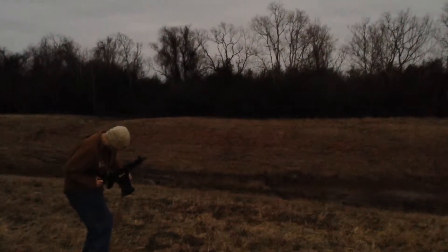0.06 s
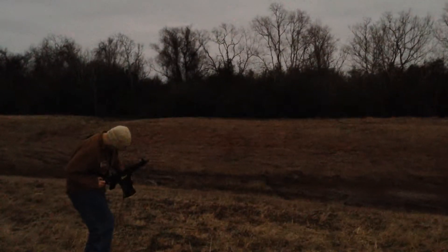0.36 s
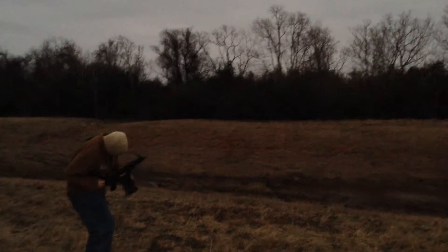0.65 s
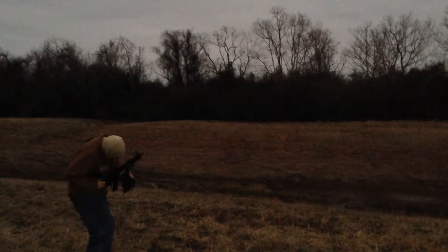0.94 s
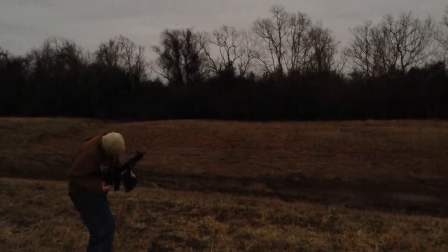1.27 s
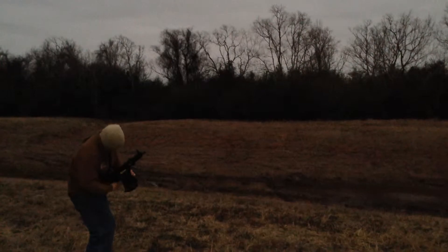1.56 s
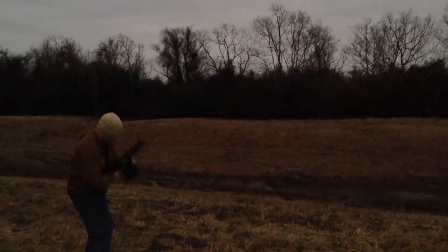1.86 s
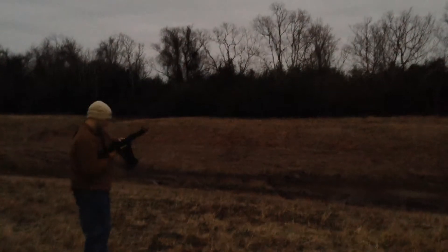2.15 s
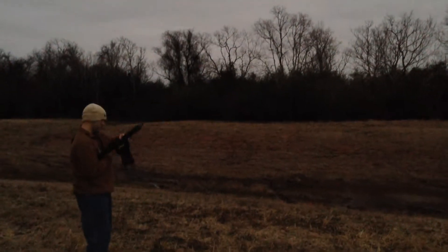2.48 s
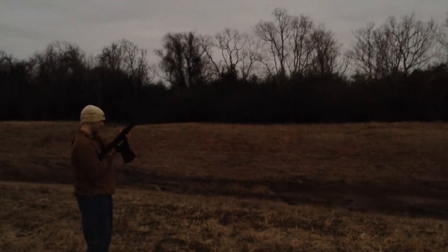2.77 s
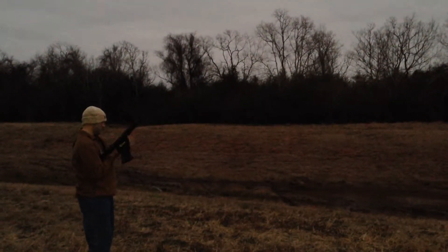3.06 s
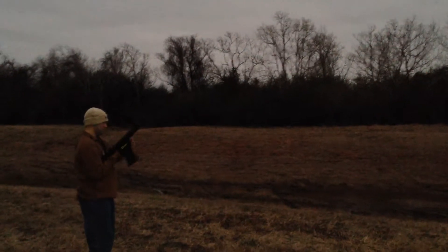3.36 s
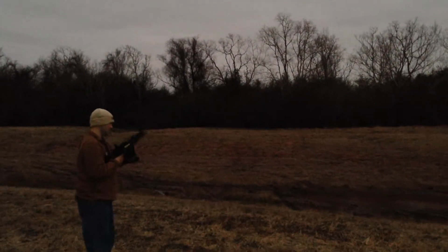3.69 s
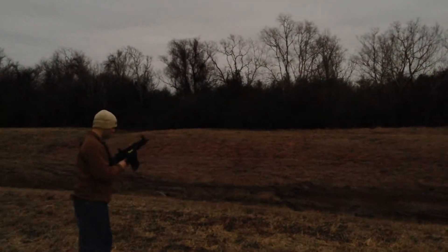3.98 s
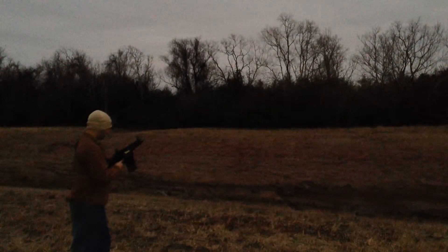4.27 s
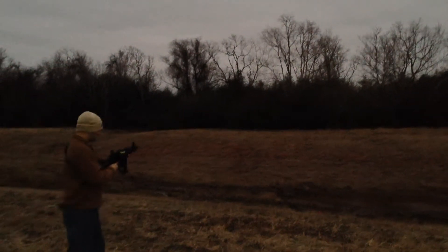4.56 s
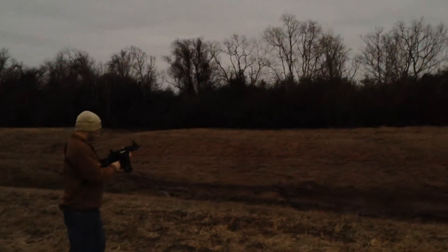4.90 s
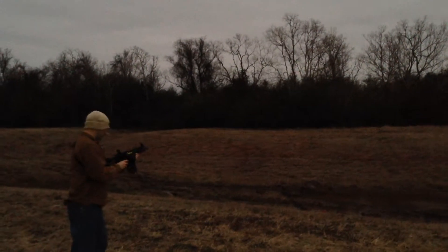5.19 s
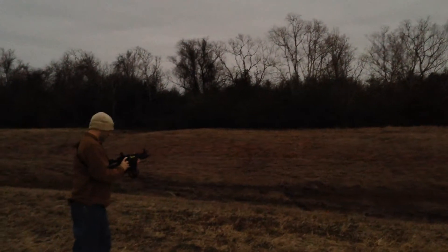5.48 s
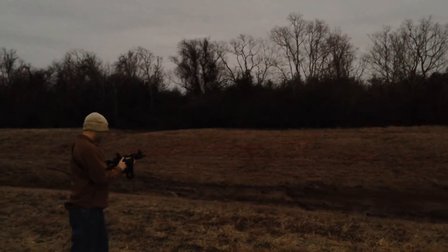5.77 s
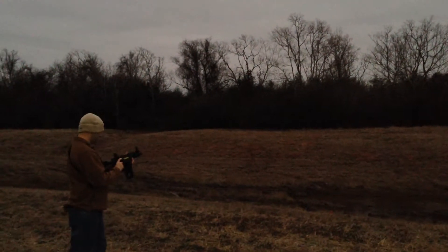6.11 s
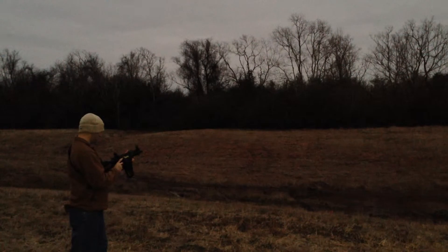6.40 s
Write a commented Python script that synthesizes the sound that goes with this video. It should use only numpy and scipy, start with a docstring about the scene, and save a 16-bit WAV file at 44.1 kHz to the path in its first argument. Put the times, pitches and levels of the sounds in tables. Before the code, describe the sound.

Two loud steel clacks stand out against faint wind, hiss and distant traffic: first a gun's magazine knocking into place, then the bolt snapping closed. A sleeve swishes softly and the microphone takes a few low bumps around the first clack. Afterwards small controls click at uneven intervals, some with a thin ring. It is all heard from several metres away in an open field with a slight echo.

```python
"""A firearm is handled in an open winter field: the magazine slides in and latches, the bolt is slapped
shut, and small controls click with a thin ring. Each time steel hits steel, a burst of noise makes the
crack and fading tones make the ring. A sleeve brushes the stock; an earth bank and trees echo faintly.
Light wind, far traffic and hiss lie underneath. The camera, some metres off, picks up a few soft bumps
and turns itself down after the two loud clacks."""
import sys
import numpy as np
from scipy import signal
from scipy.fft import rfft, irfft, next_fast_len
from scipy.io import wavfile
from scipy.ndimage import uniform_filter1d, map_coordinates

SR = 44100
rng = np.random.default_rng(int(sys.argv[2]) if len(sys.argv) > 2 else 0)


def transcribe(u):
    """Save the signal u as a 16-bit wav file named by the first command-line argument.

    u: samples, shape (n,) or (channels, n), limited to [-1, 1]; the rate is SR.
    q: integer samples, one column per channel.
    """
    v = np.clip(np.atleast_2d(u).T, -1, 1)
    q = np.round(v * 32767).astype(np.int16)
    wavfile.write(sys.argv[1], SR, q)


N = 292878
T = np.arange(N) / SR  # time in the scene [s]
AGE = np.arange(SR // 3) / SR  # time since a hit [s]


def amp(db):
    """Turn decibels into a gain to multiply by."""
    return 10 ** (np.asarray(db) / 20)


def unit(x):
    """Scale to an average (rms) level of 1."""
    return x / np.sqrt(np.mean(x ** 2) + 1e-20)


def gain(points, hz):
    """Read the gain at hz off a tone curve of (frequency [Hz], level [dB]) points."""
    freqs, db = np.transpose(points)
    return amp(np.interp(np.log(hz + 1), np.log(freqs), db))


def curve(rows):
    """Join (time [s], value) points with straight lines."""
    return np.interp(T, *np.transpose(rows))


def wobble(rate):
    """A smooth curve through `rate` random values a second."""
    return map_coordinates(rng.standard_normal(int(T[-1] * rate) + 4), [T * rate])


def swells(rows):
    """Smooth rises and falls in gain from (time [s], level [dB], length [s]) rows."""
    return sum(amp(db) * np.exp(-((T - s) / length) ** 2) for s, db, length in rows)


def rise_fall(t, rise, fall):
    """Gain that climbs to 1 at t = 0 and dies again, both in dB per second."""
    return amp(-np.abs(t * np.where(t < 0, rise, fall)))


def filtered(x, response):
    """Change the tone of x so that nothing sounds before the hit (a minimum-phase filter)."""
    size = 2 * next_fast_len(len(x))
    gains = np.maximum(response(np.fft.rfftfreq(size, 1 / SR)), 1e-6)
    cepstrum = irfft(np.log(gains))
    cepstrum[1:size // 2] *= 2
    cepstrum[size // 2 + 1:] = 0
    return irfft(rfft(x, size) * np.exp(rfft(cepstrum)))[:len(x)]


def noise(tone, size=N):
    """Noise shaped by a tone curve, at an average level of 1."""
    padded = next_fast_len(size)
    white = rfft(rng.standard_normal(padded))
    shaped = white * gain(tone, np.fft.rfftfreq(padded, 1 / SR))
    return unit(irfft(shaped, padded)[:size])


def add(track, s, sound):
    """Mix a sound in at s seconds."""
    part = track[max(round(s * SR), 0):][:len(sound)]
    part += sound[:len(part)]


def ring(notes, scatter_db):
    """Struck steel rings a little differently each time; a note drops 60 dB in its fade time."""
    hz, db, fade = np.transpose(notes)[:, :, None]
    strength = amp(db + scatter_db * rng.standard_normal(db.shape))
    waves = strength * amp(-60 * AGE / fade) * np.sin(2 * np.pi * (hz * AGE + rng.random(hz.shape)))
    return waves.sum(0) / np.sqrt(np.sum(strength ** 2) / 2)


def steel_hit(crack, notes, ring_db, knock_db, bright_db, fade, hold_s, grip=0.047, bass_db=-8):
    """Steel hits steel: the parts chatter for hold_s, then the crack fades and the notes ring on."""
    attack = 1 - np.exp(-AGE / .00015)
    burst = noise(crack, size=len(AGE)) * amp(-60 * np.maximum(AGE - hold_s, 0) / fade)
    body = amp(ring_db) * ring(notes, scatter_db=1.5)
    body *= amp(-60 * grip * AGE / fade)  # tight contact muffles the ring
    # small parts give little bass; knock lifts the lows of heavy hits, brightness the highs of sharp ones
    tone = [(130, knock_db + bass_db), (230, knock_db), (1500, knock_db), (2400, knock_db * .7),
            (3900, 0), (5800, 0), (9000, bright_db), (15000, 2.1 * bright_db)]
    return filtered(attack * (burst + body), lambda hz: gain(tone, hz))


def clack(hits, crack, notes, ring_db, hold_s):
    """A quick run of hits and bounces on one part."""
    out = np.zeros(N)
    for s, db, knock_db, bright_db, fade in hits:
        add(out, s, amp(db) * steel_hit(crack, notes, ring_db, knock_db, bright_db, fade, hold_s))
    return out


# how hard the wind blows: (time [s], relative level [dB])
WIND_STRENGTH = [(0.03, -56.5), (0.56, -72), (1.24, -64), (1.57, -75), (1.89, -71), (3.23, -65),
                 (3.58, -67.5), (4.93, -62.5), (5.57, -69.5), (5.9, -62.5), (6.64, -63.5)]
# puffs on the microphone, and dry grass stirring: (time [s], level [dB], length [s])
WIND_PUFFS = [(.15, -58, 0.012), (.31, -59, 0.02), (.41, -58, .025), (.74, -53.5, 0.015),
              (1.12, -52.5, .03), (1.28, -51, .03), (1.83, -59, 0.032), (2.12, -55.5, 0.042),
              (2.57, -60, 0.019), (4.34, -65, .02), (5.36, -62.5, 0.024), (6.53, -56.5, .025)]
GRASS_STIRS = [(.25, -78.5, .65), (4.83, -76.5, 0.13), (5.8, -83, 1)]
# tone of the wind and of the hiss: (frequency [Hz], level [dB])
WIND_TONE = [(20, -26.5), (35, -12.5), (55, 1), (85, -1), (130, -6), (200, -18), (400, -31.5), (900, -59.5)]
HISS_TONE = [(200, -5.5), (1500, -1.5), (2500, -1), (3800, 2), (6000, 0.5), (10000, -1.5), (15000, -2.5)]


def breeze(lift_db=2.5, flutter_db=2.5, hiss_db=-68.5):
    """Wind flutters and puffs on the microphone; a fine hiss swells as dry grass stirs."""
    gusts = amp(curve(WIND_STRENGTH) + lift_db + flutter_db * wobble(16))
    rumble = (gusts + swells(WIND_PUFFS)) * noise(WIND_TONE)
    hiss = (amp(hiss_db) + swells(GRASS_STIRS)) * noise(HISS_TONE)
    return rumble + hiss


# how loud the traffic is: (time [s], relative level [dB])
ROAR_LEVEL = [(0.0, -66.5), (1.76, -71), (2.62, -66), (3.14, -69), (4.9, -70.5), (6.19, -67.5),
              (6.64, -68.5)]
# tone of its roar: (frequency [Hz], level [dB])
ROAR_TONE = [(60, -6.5), (150, 1), (350, -1), (550, -1.5), (900, -3.5), (1300, -10), (2000, -22.5),
             (4000, -45)]
# tyres whine as cars pass: (time [s], level [dB], length [s])
TYRE_WHINES = [(2.62, -70, .2), (3.68, -68.5, .27)]


def far_road(lift_db=1.5, engine_hz=55, tyre_hz=506):
    """Far traffic roars softly, an engine drones slowly nearer and tyres give a wavering whine."""
    roar = amp(curve(ROAR_LEVEL) + lift_db + .7 * wobble(4.4)) * noise(ROAR_TONE)
    drone_db = -76.5 + 0.84 * T + 2 * wobble(2.6)
    drone = amp(drone_db) * np.sin(2 * np.pi * np.cumsum(engine_hz + wobble(2)) / SR)
    whine_hz = tyre_hz + 8 * T + 14 * wobble(90)
    whine = swells(TYRE_WHINES) * amp(2 * wobble(25)) * np.sin(2 * np.pi * np.cumsum(whine_hz) / SR)
    return roar + drone + whine


# sharp clicks, plus a soft, dull echo at 0.1 s: (time [s], relative level [dB], knock [dB],
# brightness [dB], fade [s], body pitch [Hz], catch pitch [Hz], spring level [dB])
CLICKS_AND_ECHO = [(0.0005, -41.5, 12.5, -2, 0.075, 1410, 3260, -90),
                   (.1, -64, 8, -10, 0.26, 1500, 2100, -90), (2.0409, -40.5, 0, -6, 0.025, 2800, 3650, -90),
                   (2.8746, -66.5, -13, 9, 0.013, 7500, 9930, -88),
                   (3.4829, -53, 11, -7, 0.014, 1900, 7000, -90),
                   (3.9738, -38, 1.5, 1.5, 0.028, 1315, 3900, -50),
                   (3.9830, -46.5, 5, -24, 0.033, 990, 2090, -70),
                   (3.9950, -56, 7, 4, 0.074, 1800, 5530, -55),
                   (4.4583, -39, 5.5, -1.5, 0.017, 1020, 4860, -55),
                   (4.9329, -38, 2.5, 2.5, 0.029, 1934, 2960, -60),
                   (4.984, -49.5, 6.5, -11, 0.016, 2076, 3820, -90),
                   (5.151, -43, -2, 0, 0.03, 1460, 6700, -48),
                   (5.9450, -59.5, -1, 5.5, .04, 2500, 4530, -89),
                   (6.247, -54.5, -18, 5.5, 0.02, 3840, 6500, -60)]
# tone of a click's crack: (frequency [Hz], level [dB])
CLICK_TONE = [(150, -25), (500, -19), (900, -7.5), (1300, -4.5), (1700, -7), (2600, -8.5), (5000, -1),
              (7500, -4), (11000, -6.5), (15000, -8)]
# ringing notes of a catch and of its spring: (pitch [Hz], relative level [dB], fade [s])
CATCH_NOTES = [(783, 2, 0.033), (1285, -1.5, 0.068), (2023, -5.5, 0.047), (2728, -1, 0.032),
               (4440, 7, 0.027), (5300, 3, .03)]
SPRING_NOTES = [(10900, 5, 0.14), (10975, 4, 0.13), (11200, 2, 0.079), (14700, -5, 0.13), (15050, -9, .07)]


def clicks(boost_db=10, width=0.18, bounce_s=.0075, bounce_db=-11, spring_rise_s=.006):
    """Sharp clicks bounce once and set a spring singing; a soft, dull echo follows the opening clack."""
    out = np.zeros(N)
    spring_rise = 1 - np.exp(-AGE / spring_rise_s)  # the spring takes a moment to pick up the blow
    for s, db, knock_db, bright_db, fade, body_hz, catch_hz, spring_db in CLICKS_AND_ECHO:
        def resonance(hz):
            """Boost the sound near the row's two pitches."""
            return amp(sum(boost_db / (1 + ((hz / peak - 1) / width) ** 2)
                           for peak in (body_hz, catch_hz)))

        for delay, drop_db in ((0, 0), (bounce_s, bounce_db)):
            hit = steel_hit(CLICK_TONE, CATCH_NOTES, ring_db=-10.5, knock_db=knock_db,
                            bright_db=bright_db, fade=fade, hold_s=0.00032)
            add(out, s + delay, amp(db + drop_db - boost_db / 2) * filtered(hit, resonance))
        add(out, s, amp(spring_db) * spring_rise * ring(SPRING_NOTES, scatter_db=1))
    return out


# echoes off ground, bank and trees: (delay [s], relative level [dB], rise [dB/s], fall [dB/s])
ECHOES = [(.05, -7, 280, 60), (.105, 2, 450, 280), (.24, -5, 601.5, 80)]
# their tone: (frequency [Hz], level [dB])
ECHO_TONE = [(200, -10.5), (1000, -0.5), (2200, 1), (4200, -2), (8000, -4), (14000, -15)]


def field_echo(x, level_db=-43):
    """The ground, the bank and the trees each scatter back a faint, dull echo."""
    t = np.arange(SR) / SR
    shape = np.max([amp(db) * rise_fall(t - delay, rise, fall) for delay, db, rise, fall in ECHOES], 0)
    tail = noise(ECHO_TONE, size=SR) * shape
    return amp(level_db) * signal.fftconvolve(x, tail / np.linalg.norm(tail))[:N]


# swishes of cloth: (time [s], level [dB], length [s])
SWISHES = [(0.723, -66, 0.03), (.8, -72, 0.015), (1.142, -55, 0.015), (1.286, -67.5, 0.062),
           (1.66, -70.5, .03), (2.531, -72.5, 0.041)]
# their tone: (frequency [Hz], level [dB])
CLOTH_TONE = [(500, -35), (2000, 3), (2800, -12), (3800, 11), (4600, -0.5), (6500, -6), (10000, -32)]


def sleeve(rough_db=2.9):
    """A sleeve brushes the stock in short, grainy swishes."""
    return swells(SWISHES) * unit(noise(CLOTH_TONE) * amp(rough_db * wobble(150)))


# magazine, then bolt, sliding home:
# (stop time [s], level [dB], rise [dB/s], tail level [dB], tail length [s])
STROKES = [(1.031, -36, 340, -46.5, .042), (3.15, -32, 1499.5, -48.5, 0.034)]
# tone of steel rubbing steel: (frequency [Hz], level [dB])
SCRAPE_TONE = [(150, -26), (500, -7), (1300, 3.5), (2400, -4.5), (4000, 1.5), (6000, -4), (8000, -3),
               (11000, -3), (15000, -11)]


def sliding(stop_db_per_s=780, tail_lag_s=0.041, rough_db=1.4):
    """Parts rub ever harder on their way in and stop short; a brief hissy tail follows each stroke."""
    rubbing = sum(amp(db) * rise_fall(T - s, rise, stop_db_per_s) for s, db, rise, _, _ in STROKES)
    tails = swells([(s + tail_lag_s, db, length) for s, _, _, db, length in STROKES])
    scrape = unit(noise(SCRAPE_TONE) * amp(rough_db * wobble(600)))
    return np.maximum(rubbing, tails) * scrape


# the magazine's hits: (time [s], level [dB], knock [dB], brightness [dB], fade [s])
MAGAZINE_HITS = [(1.0022, -22, -15.5, -5.5, 0.0092), (1.0122, -22, -20.5, 0.5, 0.017),
                 (1.0305, -22.5, -4.5, -2.5, .025), (1.0328, -12.5, 0.5, 1.5, 0.039),
                 (1.0358, -8.5, -0.5, -1, 0.021), (1.0465, -22, -2.5, 1, 0.032),
                 (1.0495, -30, -4, -1.5, 0.087)]
# tone of their crack: (frequency [Hz], level [dB])
MAGAZINE_TONE = [(100, -43.5), (280, -26), (370, -10.5), (650, -5), (820, -18.5), (1030, -2.5),
                 (1600, -9.5), (2600, -3), (3900, 2), (4800, -5), (6200, 3), (7500, -3.5), (11000, -4),
                 (15000, -9)]
# the magazine's ringing notes: (pitch [Hz], relative level [dB], fade [s])
MAGAZINE_NOTES = [(352, -18, 0.068), (549, -17.5, 0.01), (659.7, -12.5, .04), (1033, -2, 0.03),
                  (1414.6, -5.5, 0.057), (1905, 4, 0.031), (2230, -10.5, .04), (3004, -6.5, 0.045),
                  (3600, -7.5, 0.058), (3845, -3.5, 0.063), (4811, -9.5, .05), (5290, -8, 0.1),
                  (5447, -3, 0.033), (6100, -6.5, 0.028), (7630, -7, .04), (8000, -6, 0.051),
                  (8900, -4, .05), (11440, -6.5, 0.034)]


def magazine():
    """The magazine knocks into place, latches and rings briefly."""
    return clack(MAGAZINE_HITS, MAGAZINE_TONE, MAGAZINE_NOTES, ring_db=-5, hold_s=.0001)


# low bumps at the camera: (time [s], level [dB], pitch [Hz], length [s])
SOFT_BUMPS = [(1.1568, -31, 220, 0.0018), (1.1616, -31.5, 109, 0.0022), (1.197, -42.5, 105, 0.0088),
              (1.266, -34, 225, 0.0039), (1.341, -42.5, 110, 0.0085)]
# tone of the shudder around them: (frequency [Hz], level [dB])
SHUDDER_TONE = [(30, -9.5), (60, -0.5), (110, 1), (200, -10), (400, -24), (900, -51)]


def bumps(lag_s=.008, shudder_below_db=21, shudder_s=0.041):
    """Soft pushes on the microphone, a wave or two each, inside a short low shudder."""
    pushes = sum(swells([(s, db, length)]) * np.sin(2 * np.pi * hz * (s - T))
                 for s, db, hz, length in SOFT_BUMPS)
    shudder = swells([(s + lag_s, db - shudder_below_db, shudder_s) for s, db, _, _ in SOFT_BUMPS])
    return pushes + shudder * noise(SHUDDER_TONE)


# the bolt's hits: (time [s], level [dB], knock [dB], brightness [dB], fade [s])
BOLT_HITS = [(3.1405, -22, -8, 0.5, .013), (3.1436, -11, -2, 3, 0.022), (3.1474, -11.5, -2.5, -1.5, 0.042),
             (3.1573, -8, -3.5, -1, 0.041), (3.1596, -16, 5, -1, 0.034), (3.1657, -16, -6.5, -1, 0.038),
             (3.1695, -22, 1.5, 2.5, .06), (3.1760, -26.5, 2, 1.5, 0.074), (3.1865, -35, -1, 1, 0.077)]
# tone of their crack: (frequency [Hz], level [dB])
BOLT_TONE = [(100, -44), (210, -25), (290, -16), (370, -14.5), (430, -30), (600, -26.5), (730, -7),
             (1000, -10.5), (1300, -3), (1900, 3), (3500, -2.5), (6200, -3.5), (7500, -10.5), (11000, -12),
             (15000, -19)]
# ringing notes of the steel frame: (pitch [Hz], relative level [dB], fade [s])
FRAME_NOTES = [(279.9, -13.5, 0.06), (372, -18, .07), (728, -8.5, .06), (820, -3.5, .06), (1129, -8, 0.13),
               (1506, -5, 0.05), (1890, 4, .05), (2000, -5.5, 0.061), (2095, 1, .07), (2228, -3.5, 0.061),
               (2820, 4, 0.055), (3097, -1, 0.076), (3445, -1, 0.065), (3864, 1.5, 0.082),
               (4756, -9.5, 0.064), (5500, -7, .06), (5920, -3, .05), (8113, -11.5, .06)]


def bolt():
    """The bolt slams shut and sets the steel frame around it ringing."""
    return clack(BOLT_HITS, BOLT_TONE, FRAME_NOTES, ring_db=-6.5, hold_s=.0005)


def scene():
    """The firearm, its echo and the open air, in one channel."""
    gun = magazine() + bolt() + clicks() + sliding()
    return (gun + field_echo(gun) + sleeve() + bumps() + breeze() + far_road())[None]


def gain_control(x, threshold_db=-18, depth_db=3, recovery_db_per_s=3.2):
    """Loud peaks turn the volume down by up to depth_db; then it creeps back."""
    over_db = np.clip(20 * np.log10(np.abs(x) + 1e-9) - threshold_db, 0, depth_db)
    creep_db = recovery_db_per_s * T
    cut_db = np.maximum.accumulate(over_db + creep_db) - creep_db
    return x * amp(-uniform_filter1d(cut_db, size=64))


def record(dry, top_hz=15400):
    """The camera turns down after loud peaks and cuts the highest treble."""
    treble_cut = signal.firwin(301, top_hz, fs=SR, window="blackman")
    return signal.fftconvolve(gain_control(dry[0]), treble_cut, "same")[None]


dry = scene()
out = record(dry)
transcribe(out)
```